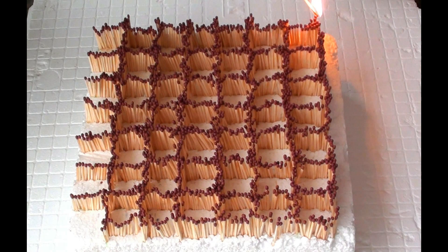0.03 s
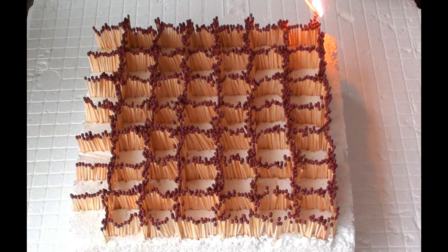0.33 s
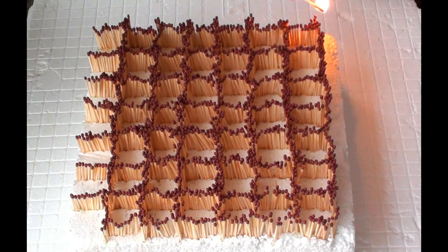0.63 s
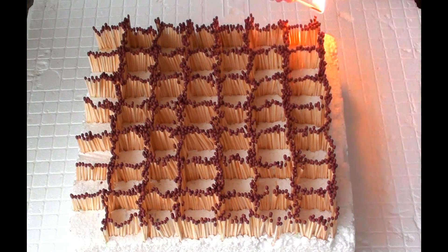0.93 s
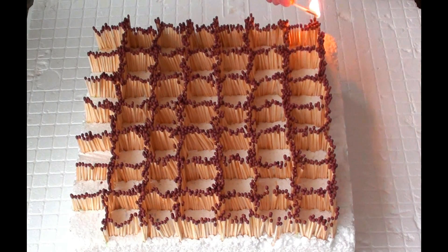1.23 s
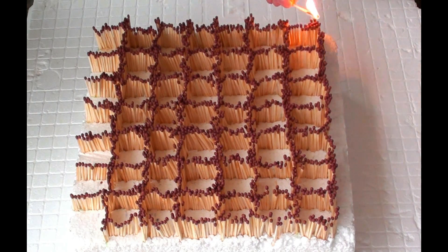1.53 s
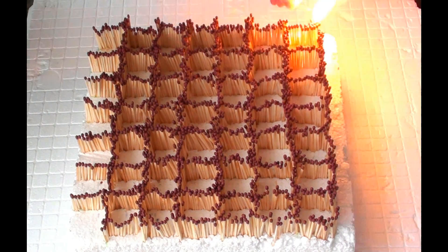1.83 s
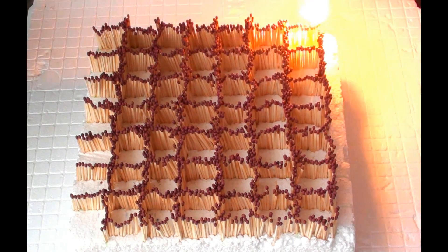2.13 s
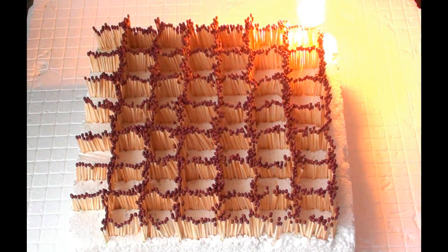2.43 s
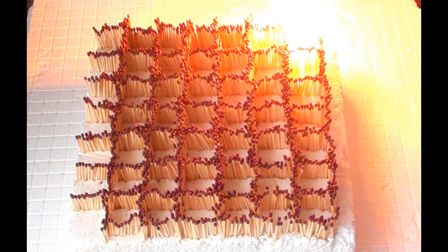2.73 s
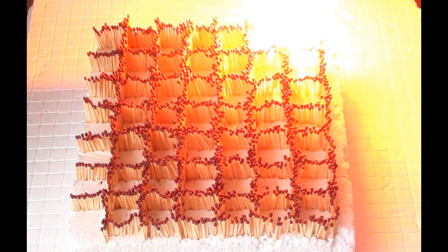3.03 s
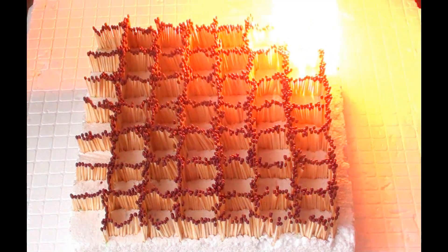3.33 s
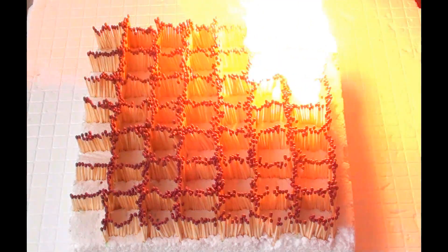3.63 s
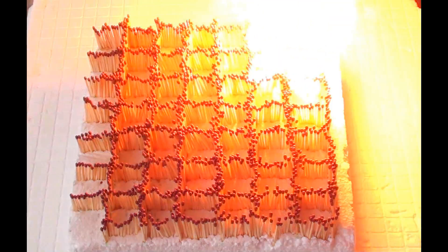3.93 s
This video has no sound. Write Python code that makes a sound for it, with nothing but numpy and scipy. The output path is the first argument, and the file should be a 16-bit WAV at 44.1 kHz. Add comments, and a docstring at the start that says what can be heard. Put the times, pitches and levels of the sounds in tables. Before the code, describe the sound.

Match heads flare up one after another, hissing and sizzling over a growing flame roar and scattered pops. Before that, a single burning match faintly ticks, spits and whistles. The room reflects slightly, and the sound is nearly mono.

```python
"""In a quiet room a lit match is held to the corner of a grid of matches; it ticks, spits and whistles.
From about two seconds the heads catch one after another: escaping gas hisses and sizzles with a hollow
ring, and the turbulent flame roars and flutters as it grows. Near three seconds the fire leaves its corner,
the hiss broadens and heads burst with louder pops. Throughout, the board and the room reflect the fire's
sound into a nearly mono microphone."""
import sys
import numpy as np
from scipy import signal
from scipy.fft import rfft, irfft
from scipy.io import wavfile

SR = 44100
rng = np.random.default_rng(int(sys.argv[2]) if len(sys.argv) > 2 else 0)


def store_pcm(level_fs):
    """Save levels as 16-bit WAV."""
    pcm = np.round(np.clip(level_fs, -1, 1) * 32767).astype(np.int16)
    wavfile.write(sys.argv[1], SR, np.atleast_2d(pcm).T)


N = 176400

# Course of the blaze. Each row: time in seconds, then relative levels of hiss, fizz and roar in dB.
BLAZE_LEVELS = [(2.015, -62, -80, -82), (2.038, -52, -61, -66.5), (2.049, -42, -50, -47),
                (2.16, -39.5, -47, -52), (2.27, -36, -44, -47), (2.36, -39, -55, -45.5),
                (2.45, -38.5, -57, -47.5), (2.53, -45, -65, -52.5), (2.65, -40.5, -54, -48.5),
                (2.74, -34, -50, -41.5), (2.788, -37.5, -53, -43.5), (2.915, -31.5, -42.5, -39),
                (2.955, -37, -46.5, -41.5), (3.02, -36.5, -44.5, -39.5), (3.11, -32.5, -40.5, -39),
                (3.2, -37, -44, -39), (3.28, -34, -45, -41), (3.4, -39.5, -51, -41),
                (3.498, -39, -43.5, -42.5), (3.6, -32.5, -47, -38), (3.68, -36.5, -55, -40.5),
                (3.76, -31.5, -52, -38.5), (3.89, -33.5, -40.5, -35), (4.0, -32, -43.5, -36.5)]
# Spectra of the sources. Each row: frequency in Hz, relative spectral level in dB.
CORNER_HISS_SPECTRUM = [(2000, -35), (3100, -14), (4200, -6), (5500, -7.5), (6200, -5), (6800, -4.5),
                        (7400, -8), (8400, -16), (12300, -26), (13200, -24), (15600, -27)]
BROAD_HISS_SPECTRUM = [(1500, -26), (2200, -5.5), (3000, -7.5), (4000, -4.5), (5200, 1), (6400, 1),
                       (7300, -3.5), (8000, -2), (9200, -10), (12000, -21.5), (15600, -27)]
FIZZ_SPECTRUM = [(7500, -38), (8400, -4), (8900, -0.5), (9600, -1), (10400, -6), (11200, -10.5),
                 (12300, -20), (13200, -16), (15600, -31)]
ROAR_SPECTRUM = [(250, -28), (480, -4), (700, 0), (900, 0.5), (1200, -4.5), (1550, -2.5), (2000, -3.5),
                 (2350, -8), (2700, -10), (4000, -29.5)]
RUMBLE_SPECTRUM = [(35, -15), (70, -9), (135, 0.5), (170, -5.5), (215, 1), (245, -5), (285, 4.5), (400, -5),
                   (700, -20)]
POP_BODY_SPECTRUM = [(200, -17), (500, -3), (1000, 2.5), (1500, -1.5), (2200, -3), (3200, -20.5),
                     (6000, -31)]
POP_CRACK_SPECTRUM = [(1500, -21.5), (3000, -16), (4300, 0.5), (6200, -2), (7500, -3.5), (10000, -23),
                      (15000, -28)]
SPIT_SPECTRUM = [(600, -27), (1350, 4.5), (2500, -18), (3900, -13), (4550, 7.5), (5400, -8), (8300, -10),
                 (9400, -2), (10500, -19), (11400, -12), (14000, -32)]
PUFF_SPECTRUM = [(20, -35), (40, 8), (80, -3), (130, 3), (220, -17), (500, -39)]
ROOM_TONE_SPECTRUM = [(20, 4), (45, -11.5), (70, 0), (130, 0), (180, -8), (280, -6.5), (400, -11.5),
                      (900, -11), (1500, -14), (2200, -17.5), (3500, -18), (4500, -17.5), (5700, -16.5),
                      (7400, -18.5), (8800, -22.5), (15500, -25.5)]
# Resonances of the first jets and of the roar. Each row: centre in Hz, width in Hz, relative gain in dB.
JET_RESONANCES = [(1482, 97, -3), (2427, 110, -6), (3600, 62, -7.5), (4580, 51, 1), (4940, 110, -1.5),
                  (5390, 120, 2.5), (5774, 220, 1), (6480, 250, 1.5), (7010, 170, -1.5), (7880, 170, -2),
                  (8520, 190, -7), (10130, 350, -15), (11550, 280, -18.5)]
ROAR_RESONANCES = [(728, 8.3, -3.5), (935, 95, -6), (1090, 8.3, -11), (1188, 105, 0.5), (1450, 32, 8.5),
                   (1684, 53, -8), (2270, 45, -1)]
# Single jets. Each row: peak time and Gaussian width in seconds, centre and width in Hz, level in dB.
JET_SWELLS = [(2.267, 0.085, 5150, 350, -42), (2.898, 0.035, 5780, 790, -40),
              (3.114, 0.039, 6200, 1460, -34.5)]
# Bursting heads and snaps of the wood.
# Each row: start in seconds, relative levels of body and crack in dB, spray decay time in seconds.
POP_EVENTS = [(.132, -46, -48.5, 0.0022), (.368, -47.5, -47, 0.0052), (.400, -53, -50, .002),
              (1.7335, -51, -53, .001), (2.042, -37, -49, 0.0028), (2.165, -36.5, -37, 0.0022),
              (2.497, -46, -35.5, .002), (2.9255, -36, -23, 0.0022), (3.142, -21.5, -31, 0.0055),
              (3.236, -26.5, -42, .004), (3.340, -36, -36, 0.0016), (3.373, -28, -45, 0.0025),
              (3.426, -24.5, -31, 0.0054), (3.589, -34, -33, 0.00041), (3.5952, -20.5, -18, 0.003)]
# Spits of the lit match. Each row: start in seconds, level in dB, length in seconds.
SPIT_EVENTS = [(1.4882, -36.5, 0.0048), (1.5316, -40, 0.0042)]
# Whistles. Each row: start and length in seconds, first, middle and last pitch in Hz, level in dB.
WHISTLE_GLIDES = [(1.656, 0.037, 8350, 7300, 6400, -54.5), (1.794, .072, 7300, 7260, 6540, -52.5)]
# Puffs of air. Each row: peak time, rise time and decay time in seconds, level in dB.
PUFF_EVENTS = [(1.125, 0.029, 0.041, -49), (1.24, .02, 0.023, -54), (2.585, 0.056, 0.039, -48)]
# Reflections from the board and nearby things. Each row: delay in seconds, gain against the direct sound.
REFLECTIONS = [(.00075, 0.027), (.0017, 0.061), (.0044, .15)]
# Hum of the room. Each row: frequency in Hz, level in dB.
HUM_TONES = [(37.5, -69), (135, -70)]
# Stereo width. Each row: frequency in Hz, gain of the left-right difference in dB.
FIRE_WIDTH = [(100, -37.5), (400, -17), (1200, -56), (2500, -10.5), (4500, -45), (6000, -16.5), (7500, -11),
              (9300, -15), (11000, -110), (15000, -68)]
ROOM_TONE_WIDTH = [(60, -46), (110, -18), (200, -13.5), (380, -4), (700, -2), (1290, -3.5), (2380, -3.5),
                   (4400, -8.5), (8120, -10.5), (15000, -28)]

HISS_DB, FIZZ_DB, RUMBLE_DB = -1.5, -0.5, -8  # offsets to the blaze levels
CATCH_S, RUMBLE_DB_PER_S = 2.04, 0.5  # the flame grows deeper after it catches
SPREAD_S = (3.13, 3.29)  # the fire leaves its corner and the hollow colour blurs
ROOM_T60_S, ROOM_TAIL_DB, ROOM_TONE_DB, BALANCE_DB = 0.42, -10.5, -54.5, 0.7


def gas_hiss(t):
    """Turbulent gas from the heads radiates noise: resonant and hollow at first, then broad."""
    times, hiss_db, fizz_db, _ = np.array(BLAZE_LEVELS).T
    sizzle = lambda: grainy(per_s=3800, spread_db=2.5, share=0.77)
    rings = sum(undb(db) * resonate(resonate(sizzle(), hz, width), hz, width)
                for hz, width, db in JET_RESONANCES)
    corner = unit(unit(rings) + undb(-3) * colour(sizzle(), CORNER_HISS_SPECTRUM))
    broad = colour(sizzle(), BROAD_HISS_SPECTRUM)
    spread = np.interp(t, SPREAD_S, [0, 1])
    hiss = np.sqrt(1 - spread) * corner + np.sqrt(spread) * broad
    hiss *= envelope(t, times, hiss_db + HISS_DB)
    fizz = colour(sizzle(), FIZZ_SPECTRUM) * envelope(t, times, fizz_db + FIZZ_DB)
    return (hiss + fizz) * flutter(rate=48, depth_db=0.8)


def flame(t):
    """Unsteady combustion radiates a crackling roar, coloured by resonances, over a low rumble."""
    times, _, _, roar_db = np.array(BLAZE_LEVELS).T
    roar = colour(grainy(per_s=300, spread_db=4, share=0.14), ROAR_SPECTRUM)
    rings = sum(undb(db) * resonate(roar, hz, width) for hz, width, db in ROAR_RESONANCES)
    roar = unit(roar + rings) * envelope(t, times, roar_db)
    rumble_db = roar_db + RUMBLE_DB + RUMBLE_DB_PER_S * (times - CATCH_S)
    rumble = colour(noise(), RUMBLE_SPECTRUM) * envelope(t, times, rumble_db)
    return roar * flutter(rate=60, depth_db=1.3) + rumble * flutter(rate=18, depth_db=1.6)


def jets(t):
    """One head at a time blows harder; resonance gives its noise a breathy pitch."""
    out = np.zeros(N)
    for peak, length, hz, width, db in JET_SWELLS:
        swell = np.exp(-((t - peak) / length) ** 2 / 2)
        out += undb(db) * swell * unit(resonate(resonate(noise(), hz, width), hz, width))
    return out


def pops(t):
    """A sudden release of pressure gives an impulse and a brief spray: dull body, bright crack."""
    body, crack = np.zeros((2, N))
    for onset, body_db, crack_db, decay in POP_EVENTS:
        start = int(onset * SR)
        burst = noise()[:N - start] * np.exp(-t[:N - start] / decay)
        burst /= np.linalg.norm(burst)
        burst[0] = undb(-6)  # the first push, against the whole spray
        body[start:] += undb(body_db) * burst
        crack[start:] += undb(crack_db) * burst
    return (colour(body, POP_BODY_SPECTRUM) + colour(crack, POP_CRACK_SPECTRUM)) * np.sqrt(SR * .001)


def spits(t, rise_s=0.003, decay_s=0.0016):
    """Spurts from the lit match are noise transients with a linear rise and an exponential decay."""
    gate = np.zeros(N)
    for start, db, length in SPIT_EVENTS:
        attack = np.clip((t - start) / rise_s, 0, 1)
        release = np.exp(-np.maximum(t - start - length, 0) / decay_s)
        gate += undb(db) * attack * release
    return colour(noise() * gate, SPIT_SPECTRUM)


def whistles(t):
    """Gas leaving the burning wood sounds thin flow tones, which waver and glide downward."""
    out = np.zeros(N)
    for start, length, *pitches, db in WHISTLE_GLIDES:
        along = np.clip((t - start) / length, 0, 1)
        glide = np.polyval(np.polyfit([0, .5, 1], pitches, 2), along)
        hz = glide * (1 + 0.018 * walk(780))
        swell = undb(db) * np.sin(np.pi * along) ** 2
        out += swell * np.sqrt(2) * np.sin(2 * np.pi * np.cumsum(hz) / SR)
    return out


def puffs(t):
    """Moving air makes slow pressure fluctuations at the microphone, heard as low thuds."""
    gate = sum(undb(db) * np.exp(-np.maximum((peak - t) / rise, (t - peak) / decay))
               for peak, rise, decay, db in PUFF_EVENTS)
    return colour(noise(), PUFF_SPECTRUM) * gate


def room(x, t):
    """Reflection adds close echoes and a short reverberation; scattering makes left and right differ."""
    decay = np.exp(-np.log(1000) * t / ROOM_T60_S) * (t > .003)
    tail, scatter = (h / np.linalg.norm(h) for h in (noise() * decay, noise() * decay))
    response = undb(ROOM_TAIL_DB) * tail
    response[0] += 1  # direct sound
    for delay, gain in REFLECTIONS:
        response[int(delay * SR)] += gain
    response /= np.linalg.norm(response)
    mid, diffuse = (signal.fftconvolve(x, h)[:N] for h in (response, scatter))
    return widen(mid, diffuse, FIRE_WIDTH) * undb(np.array([[-BALANCE_DB], [BALANCE_DB]]) / 2)


def room_tone(t):
    """Stationary noise, diffuse in the middle range, lies under a faint hum of drifting phase."""
    mid, diffuse = (unit(colour(noise(), ROOM_TONE_SPECTRUM)) * undb(ROOM_TONE_DB) for _ in range(2))
    hum = sum(undb(db) * np.sqrt(2) * np.sin(2 * np.pi * hz * t + 1.8 * walk(1.1))
              for hz, db in HUM_TONES)
    return widen(mid + hum, diffuse, ROOM_TONE_WIDTH)


def grainy(per_s, spread_db, share):
    """Shot noise: tiny bursts of uneven size carry a share of the power, smooth gas noise the rest."""
    sizes = undb(spread_db * np.minimum(rng.exponential(size=N), 5))
    bursts = (rng.random(N) < per_s / SR) * sizes * np.sign(noise())
    return np.sqrt(share) * unit(bursts) + np.sqrt(1 - share) * noise()


def envelope(t, times, db):
    """Amplitude from levels interpolated in dB, silent before the first."""
    return undb(np.interp(t, times, db, left=-np.inf))


def flutter(rate, depth_db):
    """Random amplitude modulation: quick swings of level."""
    return undb(depth_db * walk(rate))


def walk(rate):
    """Low-pass noise of rms 1 that changes about rate times a second."""
    return unit(irfft(rfft(noise()) / (1 + (np.arange(N // 2 + 1) * SR / N / rate) ** 2), N))


def colour(x, points):
    """Minimum-phase filter through (Hz, dB) points; it conserves the power of white noise."""
    hz, db = np.array(points, float).T
    f = np.maximum(np.fft.rfftfreq(N, 1 / SR), 1)
    octaves_outside = np.maximum(np.log2(hz[0] / f), 0) + np.maximum(np.log2(f / hz[-1]), 0)
    gain = unit(undb(np.interp(np.log(f), np.log(hz), db) - 20 * octaves_outside))
    cepstrum = irfft(np.log(gain), N)
    cepstrum[1:N // 2] *= 2  # folding the cepstrum makes the filter causal
    cepstrum[N // 2 + 1:] = 0
    response = irfft(np.exp(rfft(cepstrum)), N)[:N // 8]
    return signal.fftconvolve(x, response)[:N]


def resonate(x, hz, width):
    """Second-order resonance with gain 1 at the centre."""
    return signal.lfilter(*signal.iirpeak(hz, hz / width, fs=SR), x)


def widen(mid, diffuse, points):
    """Mid-side stereo: diffuse sound, weighted by (Hz, dB) points, adds left and subtracts right."""
    hz, db = np.array(points, float).T
    f = np.maximum(np.fft.rfftfreq(2 * N, 1 / SR), 1)
    gain = undb(np.interp(np.log(f), np.log(hz), db))
    side = irfft(rfft(diffuse, 2 * N) * gain)[:N]
    return np.array([mid + side, mid - side])


def noise():
    """White Gaussian noise."""
    return rng.standard_normal(N)


def unit(x):
    """Normalisation to rms 1."""
    return x / np.sqrt(np.mean(x ** 2))


def undb(db):
    """Amplitude ratio from decibels."""
    return 10 ** (np.asarray(db) / 20)


def scene():
    """Superposition: the fire and its reflections add to the puffs and the room tone."""
    t = np.arange(N) / SR
    fire = gas_hiss(t) + flame(t) + jets(t) + pops(t) + spits(t) + whistles(t)
    return room(fire, t) + puffs(t) + room_tone(t)


def record(dry, top_hz=15700):
    """Band limiting: a steep low-pass filter cuts the highest treble."""
    return signal.sosfilt(signal.ellip(12, .1, 80, top_hz, fs=SR, output="sos"), dry)


dry = scene()
out = record(dry)
store_pcm(out)
```